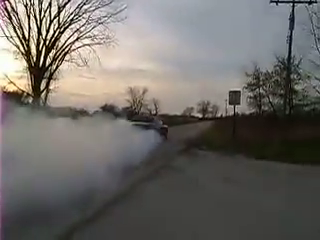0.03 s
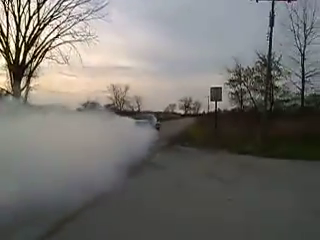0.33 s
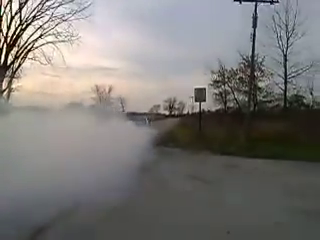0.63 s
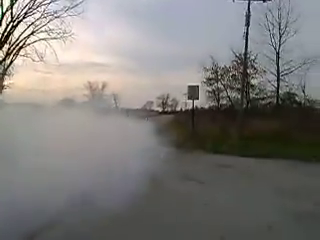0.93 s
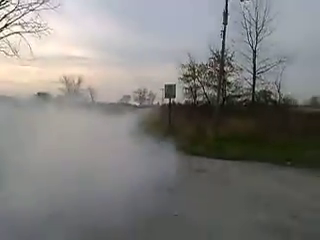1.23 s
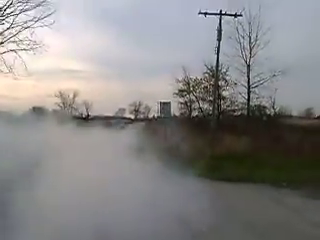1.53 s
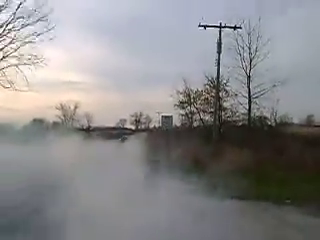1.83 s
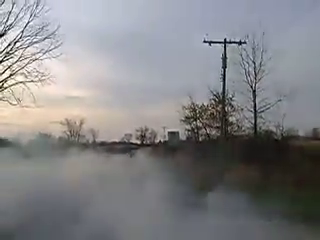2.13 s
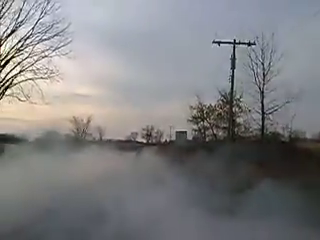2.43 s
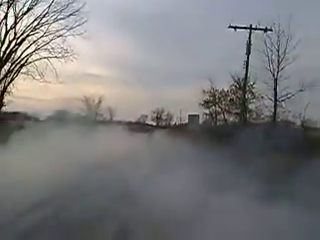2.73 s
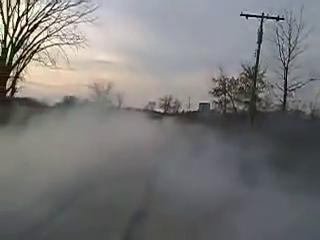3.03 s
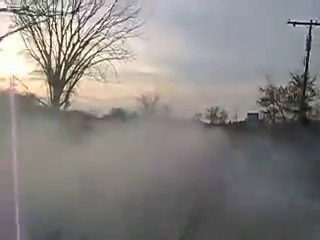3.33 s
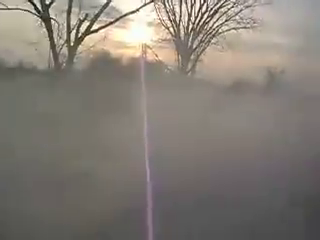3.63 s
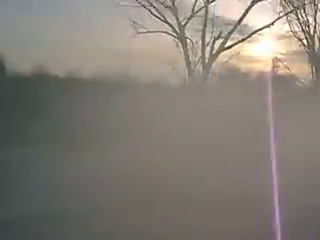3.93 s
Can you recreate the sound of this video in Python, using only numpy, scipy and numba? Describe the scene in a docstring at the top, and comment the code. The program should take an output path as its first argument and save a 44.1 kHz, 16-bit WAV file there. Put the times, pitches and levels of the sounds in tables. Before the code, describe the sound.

A car engine roars at high revs in a burnout on a country road, tyres squealing and hissing while gusts buffet the overloaded microphone. Then the engine drops to a quieter, lumpy drone with a few exhaust pops.

```python
"""Country road: a V8 held near 6000 rpm in a burnout. The exhaust roars; spinning tyres squeal and hiss.
Gusts buffet a small microphone and overload it, choking the sound for instants.
At 2.6 s the throttle closes: the engine falls to a lumpy drone, one strong beat a cycle,
and unburnt fuel pops a few times in the pipe."""
import sys
import numpy as np
from scipy import signal
from scipy.fft import rfft, irfft
from scipy.io import wavfile
from scipy.ndimage import uniform_filter1d, map_coordinates
from numba import njit

SR = 44100
rng = np.random.default_rng(int(sys.argv[2]) if len(sys.argv) > 2 else 0)


def dump_mix(stems):
    """Bounce the given channels to the path in sys.argv[1] as a 16-bit WAV at rate SR."""
    frames = np.atleast_2d(stems).T  # one column per channel
    limited = np.clip(frames, -1, 1)  # hard clip at full scale
    pcm = np.round(limited * 32767).astype(np.int16)
    wavfile.write(sys.argv[1], SR, pcm)


N = 176400

# engine speed (time [s], four-stroke cycle rate [Hz])
CYCLE_RATE = [(0.0, 51.05), (0.19, 48.75), (0.4, 51.32), (1.5, 50.4), (1.7, 49.34), (1.88, 50.11),
              (2.23, 49.58), (2.41, 47.24), (2.55, 48.4), (2.57, 47.58), (2.63, 42.9), (2.72, 33.46),
              (2.74, 33.28), (3.02, 33.81), (3.16, 33.9), (3.29, 32.74), (3.56, 32.38), (4.0, 30.8)]
# open throttle (time [s], firing note [dB], octave [dB], growl [dB], bank note [dB])
ROAR_LEVELS = [(0, -11, -26, -9, -21), (.2, -5.5, -45, -17.5, -16.5), (.4, -8.5, -21.5, -9.5, -17.5),
               (.9, -9, -22, -10.5, -29.5), (1.55, -8, -14, -9.5, -28.5), (1.7, -9.5, -12.5, -12, -34.5),
               (2.25, -11, -16, -11.5, -37), (2.38, -11, -10, -22.5, -29),
               (2.55, -11.5, -11.5, -20.5, -26.5), (2.62, -12, -24, -24.5, -25), (2.67, -31, -28, -22, -30),
               (2.76, -57.5, -65, -53.5, -64), (4, -78, -85, -83, -88.5)]
# growl (order [x cycle rate], relative level [dB])
GROWL_ORDERS = [(1, -14.5), (2, -6), (3, -6), (5, -18.5), (6, -10), (7, 1), (9, -4), (10, 2), (11, -4.5),
                (12, -4.5), (13, -9.5), (14, -3.5), (15, -3.5), (17, -7.5), (18, -7.5), (19, -9.5),
                (20, -5), (25, -9.5), (26, -12)]
# rasp (order [x cycle rate], relative level [dB])
RASP_ORDERS = [(21, 0.5), (22, -5.5), (23, -3), (24, -3.5), (25, -5.5)]
# rasp (time [s], level [dB])
RASP_LEVEL = [(0, -20), (.2, -21), (.48, -19.5), (.75, -27), (.95, -17), (1.2, -15.5), (1.5, -19.5),
              (1.7, -13.5), (1.9, -19.5), (2.3, -16.5), (2.52, -26), (2.7, -53), (4, -78.5)]
# gas rush (frequency [Hz], relative level [dB])
GAS_SPECTRUM = [(100, -15.5), (250, -7), (430, 2), (620, -10.5), (800, -6), (1250, -13), (1500, -21.5),
                (5000, -22)]
# closed throttle (time [s], thump [dB], low ring [dB], high ring [dB])
DRONE_LEVELS = [(0, -73, -76, -66), (2.6, -52, -36, -59), (2.71, -22.5, -24.5, -41.5), (3.0, -21, -26, -34),
                (3.28, -20.5, -27.5, -31), (3.47, -21.5, -26, -41.5), (3.83, -22.5, -32.5, -47.5),
                (4, -23, -30.5, -52)]
# coasting beats (position [cycles], relative level [dB])
BEATS = [(0, -6.5), (0.308, -12.5), (0.638, -12)]
# exhaust body (frequency [Hz], relative level [dB])
BODY_SPECTRUM = [(30, -21), (66, -18), (98, -4.5), (130, 7.5), (163, 0), (198, -1.5), (232, -9.5),
                 (262, -3.5), (350, -10.5), (430, -6.5), (560, -14), (800, -13), (950, -19.5), (1400, -48),
                 (5000, -61)]
# pipe resonances (frequency before sag [Hz], width per stage [Hz])
PIPE_RINGS = [(668, 110), (1115, 55)]
# pops (time [s], peak [dB])
POPS = [(2.781, -15), (2.925, -11), (2.992, -19), (3.039, -9.5)]
# pop (frequency [Hz], relative level [dB])
POP_SPECTRUM = [(300, -31.5), (700, 6.5), (900, -2), (1150, -18), (1450, -29), (4000, -53)]
# tyre squeal (time [s], pitch [Hz], level [dB])
SQUEAL = [(0, 1200, -7), (.16, 1220, -46), (.26, 1235, -26), (.34, 1250, -9.5), (.4, 1255, -21),
          (.44, 1070, -13.5), (.72, 1080, -27), (.95, 1080, -19.5), (1.17, 1100, -10.5), (1.4, 1110, -19.5),
          (1.7, 1150, -17.5), (1.82, 1190, -19), (2.1, 1120, -22.5), (2.33, 1130, -27.5), (2.68, 1080, -45),
          (4, 1050, -72)]
# rubber on asphalt (time [s], level [dB])
HISS_LEVEL = [(0, -16.5), (.7, -25.5), (1.2, -19.5), (1.9, -21.5), (2.5, -21), (2.68, -35), (3.02, -32),
              (3.3, -34.5), (3.55, -39), (4, -42)]
# hiss (frequency [Hz], relative level [dB])
HISS_SPECTRUM = [(300, -11.5), (1000, -2), (1600, -4), (2200, 1.5), (2800, -2.5), (3400, 1), (4600, -5),
                 (5500, -4.5)]
# road reflection (time [s], lag [ms])
REFLECTION_LAG = [(0, 0.71), (2.5, .72), (2.75, .8), (3.05, 0.85), (3.4, 0.895), (3.75, 0.947), (4, 0.99)]
# gusts (start [s], end [s], rumble [dB], buffeting [dB])
GUSTS = [(-.05, 0.097, -12, -6.5), (0.393, 0.742, -6.5, -5), (0.794, 0.924, -8, -8),
         (.95, 1.597, -8, -17.5), (1.786, 1.988, -8, -16.5), (2.062, 2.288, -12, -20)]
# gust rumble and breeze (frequency [Hz], relative level [dB])
WIND_SPECTRUM = [(15, 3.5), (50, 6), (80, -2), (120, -5), (170, -10.5), (260, -17), (600, -17),
                 (2000, -46.5)]
# buffeting (frequency [Hz], relative level [dB])
BUFFET_SPECTRUM = [(30, -19.5), (70, -9.5), (110, 0), (150, -8), (250, -22.5), (1000, -57)]
# pressure slaps (time [s], peak [dB])
SLAPS = [(0.521, 0), (0.817, 0.5), (1.053, 6.5), (1.094, 8.5), (1.133, 7), (1.17, 6), (1.35, 6), (1.39, 8),
         (1.507, 7), (1.547, 6.5), (1.586, 6), (1.926, 7), (2.148, 4.5), (2.194, 7.5)]
# steady air rumble (frequency [Hz], relative level [dB])
AIR_SPECTRUM = [(15, 1.5), (35, -5), (55, -6.5), (90, -14.5), (300, -30)]


def undb(db):
    return 10 ** (np.asarray(db) / 20)


def unit(x):
    """Scale to rms 1."""
    return x / np.sqrt(np.mean(x ** 2))


def curve(table, column=1):
    """Table column, linear in time."""
    rows = np.array(table)
    return np.interp(np.arange(N) / SR, rows[:, 0], rows[:, column])


def walk(rate_hz):
    """Smooth random drift, rms 1."""
    hold = max(int(SR / rate_hz), 1)
    steps = rng.standard_normal(4096)[:N // hold + 1]
    return unit(uniform_filter1d(np.repeat(steps, hold)[:N], hold))


def colour(x, spectrum):
    """Minimum-phase filter through (frequency [Hz], gain [dB]) points."""
    rows, size = np.array(spectrum), 2 * N
    hz = np.maximum(np.fft.rfftfreq(size, 1 / SR), 1)
    gain_db = np.interp(np.log(hz), np.log(rows[:, 0]), rows[:, 1])
    cepstrum = irfft(np.log(undb(gain_db)))
    cepstrum[1:N] *= 2
    cepstrum[N + 1:] = 0
    return irfft(rfft(x, size) * np.exp(rfft(cepstrum)))[:N]


def noise(spectrum):
    """Coloured noise, rms 1."""
    return unit(colour(rng.standard_normal(N), spectrum))


@njit
def resonate(x, hz, width_hz):
    """Band-pass, moving centre, peak gain 1."""
    y, band, low = np.empty(len(x)), 0., 0.
    for i in range(len(x)):
        g, damping = np.tan(np.pi * hz[i] / SR), width_hz / hz[i]
        v = (band + g * (x[i] + 1e-18 - low)) / (1 + g * (g + damping))
        band, low, y[i] = 2 * v - band, low + 2 * g * v, damping * v
    return y


def orders(cycle_rad, table, waver_db=2.5, waver_rad=0.48):
    """Wavering harmonics of the engine cycle, rms 1."""
    out = np.zeros(N)
    for order, db in table:
        gain = undb(db + waver_db * walk(14))
        out += gain * np.sin(order * cycle_rad + 2 * np.pi * rng.random() + waver_rad * walk(18))
    return unit(out)


def roar(cycles, uneven_rad=0.17, waver_db=0.52, gas_db=-3):
    """Open throttle: eight firings a cycle puff gas; unequal cylinders add growl and rasp."""
    cycle_rad = 2 * np.pi * cycles
    firing_rad = 8 * cycle_rad + uneven_rad * np.sin(cycle_rad)
    note = undb(curve(ROAR_LEVELS, 1) + waver_db * walk(25)) * unit(np.sin(firing_rad))
    octave_gain = undb(curve(ROAR_LEVELS, 2) + waver_db * walk(25))
    octave = octave_gain * unit(np.sin(2 * firing_rad + 0.21 * walk(33)))
    bank = undb(curve(ROAR_LEVELS, 4) + waver_db * walk(27)) * unit(np.sin(firing_rad / 2))
    gas = noise(GAS_SPECTRUM) * (1 + .5 * np.sin(firing_rad))
    growl = undb(curve(ROAR_LEVELS, 3)) * (orders(cycle_rad, GROWL_ORDERS) + undb(gas_db) * gas)
    rasp = undb(curve(RASP_LEVEL)) * orders(cycle_rad, RASP_ORDERS)
    return note + octave + bank + growl + rasp


def exhaust_pulses(cycles, jitter_s=.00011, scatter_db=1.2):
    """One strong and two weak impulses a cycle."""
    pulses, starts = np.zeros(N), np.arange(int(cycles[-1]) + 1)
    for position, db in BEATS:
        jitter, scatter = rng.standard_normal((256, 2))[starts].T
        due = np.interp(starts + position, cycles, np.arange(N), right=2 * N)
        at = (due + jitter_s * SR * jitter).astype(int)
        inside = (at >= 0) & (at < N)
        pulses[at[inside]] += undb(db + scatter_db * scatter[inside])
    return pulses


def drone(cycles, ring_lag_s=0.00191, ring_waver_db=1.5, sag_per_s=0.034, sag_start_s=2.2):
    """Closed throttle: pulses thump the exhaust and ring the pipe, whose pitch sags as it cools."""
    pulses = exhaust_pulses(cycles)
    delayed = np.roll(pulses, int(ring_lag_s * SR))
    sag = 1 - sag_per_s * np.maximum(np.arange(N) / SR - sag_start_s, 0)
    layers = [(colour(pulses, BODY_SPECTRUM), 0)]
    for hz, width_hz in PIPE_RINGS:
        ring = resonate(delayed, hz * sag, float(width_hz))
        ring = resonate(ring, hz * sag, float(width_hz))
        layers.append((ring, ring_waver_db))
    thump_db = curve(DRONE_LEVELS)
    coasting = thump_db > thump_db.max() - 10
    out = np.zeros(N)
    for column, (layer, waver_db) in enumerate(layers, 1):
        gain = undb(curve(DRONE_LEVELS, column) + waver_db * walk(45))
        out += gain * layer / np.std(layer[coasting])
    return out


def pops(decay_s=0.0016):
    """Unburnt fuel cracks in the pipe."""
    t, out = np.arange(N) / SR, np.zeros(N)
    for at_s, db in POPS:
        burst = rng.standard_normal(N) * (t >= at_s) * np.exp(-np.abs(t - at_s) / decay_s)
        pop = colour(burst, POP_SPECTRUM)
        out += undb(db) * pop / np.max(np.abs(pop))
    return out


def tyres(cycles, wander_hz=24.15, rough_db=1.5, flicker_db=2):
    """Slipping rubber squeals and hisses; the road reflection combs the hiss as the car moves."""
    throb = np.cos(2 * np.pi * cycles - 1)
    pitch_hz = curve(SQUEAL) + wander_hz * (walk(150) + 0.626 * walk(20))
    tone = np.sin(2 * np.pi * np.cumsum(pitch_hz) / SR)
    squeal = unit(tone * undb(rough_db * walk(180)) * (1 + 0.14 * throb))
    hiss = noise(HISS_SPECTRUM) * (1 + 0.12 * throb) * undb(flicker_db * walk(120))
    lag_samples = curve(REFLECTION_LAG) * SR / 1000
    reflected = map_coordinates(hiss, [np.arange(N) - lag_samples], order=1)
    return undb(curve(SQUEAL, 2)) * squeal + undb(curve(HISS_LEVEL)) * (hiss + .5 * reflected)


def wind(edge_s=0.057, slap_s=0.0078, turbulence_db=-22, breeze_db=-25.5, calm_db=-42.5, air_db=-32):
    """Air on the microphone: gusts, hissing pressure slaps, a breeze fading with the roar, rumble."""
    t = np.arange(N) / SR
    rumble, buffet = np.zeros((2, N))
    for start_s, end_s, rumble_db, buffet_db in GUSTS:
        gate = np.clip(np.minimum(t - start_s, end_s - t) / edge_s + .5, 0, 1)
        rumble += undb(rumble_db) * gate
        buffet += undb(buffet_db) * gate
    note_db = curve(ROAR_LEVELS)
    breeze = undb(breeze_db + note_db - note_db.max()) + undb(calm_db)
    slaps = sum(undb(db) * np.exp(-((t - at_s) / slap_s) ** 2) for at_s, db in SLAPS)
    slaps *= 1 + undb(turbulence_db) * noise(HISS_SPECTRUM)
    gusts = (rumble + breeze) * noise(WIND_SPECTRUM) + buffet * noise(BUFFET_SPECTRUM)
    return gusts + slaps + undb(air_db) * noise(AIR_SPECTRUM)


def scene():
    """Engine, tyres and wind at the microphone, mono."""
    cycle_hz = curve(CYCLE_RATE) * (1 + 0.00519 * walk(39.9))
    cycles = np.cumsum(cycle_hz) / SR
    return (roar(cycles) + drone(cycles) + tyres(cycles) + pops() + wind())[None]


def record(dry):
    """Microphone saturation, bass cut, amplifier limiting; a narrow-band converter spits on clipping."""
    mic_limit, amp_limit, knee, full_scale = 1.59, 0.82, 4.8, 0.694
    bass_cut_hz, band_hz, converter_hz, top_hz = 71.3, 5477, 11025, 15900
    spit_db = -47
    x = mic_limit * np.tanh(dry / mic_limit)
    x = signal.sosfilt(signal.butter(2, bass_cut_hz, "high", fs=SR, output="sos"), x)
    x = x / (1 + np.abs(x / amp_limit) ** knee) ** (1 / knee)
    band_limit = signal.firwin(161, band_hz, window="blackman", fs=SR)
    x = signal.fftconvolve(x, band_limit[None], mode="same")
    clipped = np.clip(x, -full_scale, full_scale)
    carrier = np.cos(2 * np.pi * converter_hz * np.arange(N) / SR)
    spits = clipped * (clipped / full_scale) ** 8 * carrier
    top_cut = signal.ellip(8, .2, 70, top_hz, fs=SR, output="sos")
    return signal.sosfilt(top_cut, clipped + undb(spit_db) * spits)


dry = scene()
out = record(dry)
dump_mix(out)
```